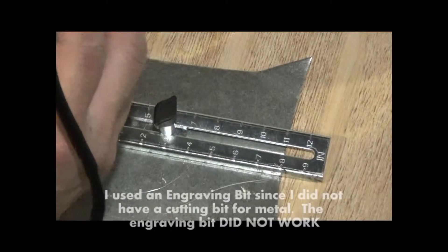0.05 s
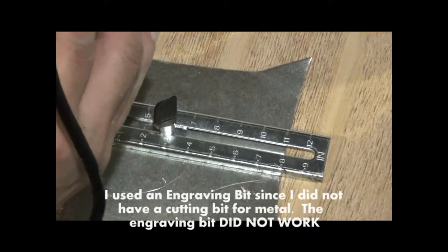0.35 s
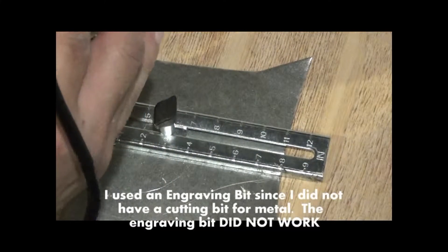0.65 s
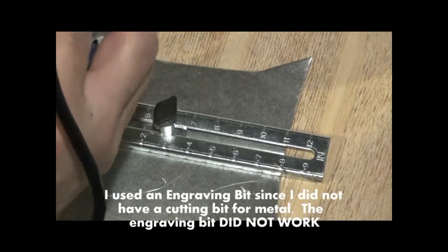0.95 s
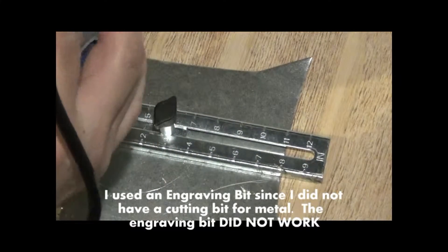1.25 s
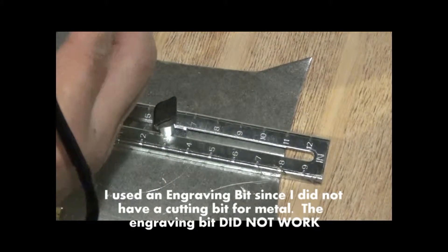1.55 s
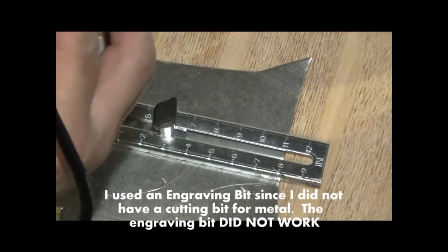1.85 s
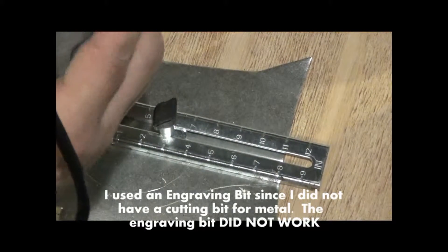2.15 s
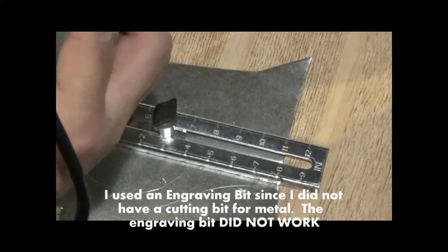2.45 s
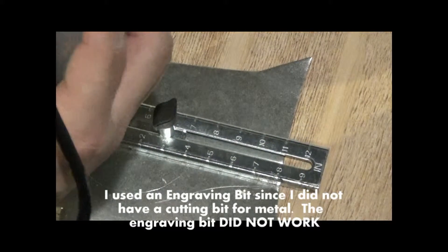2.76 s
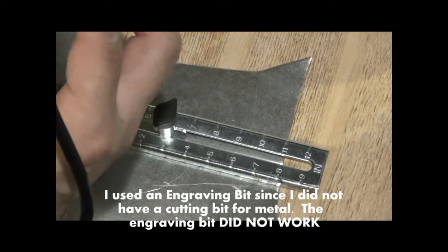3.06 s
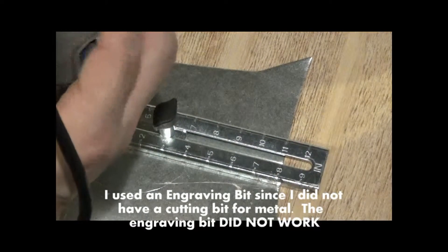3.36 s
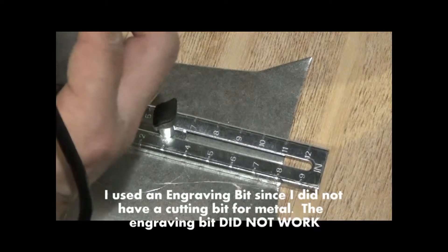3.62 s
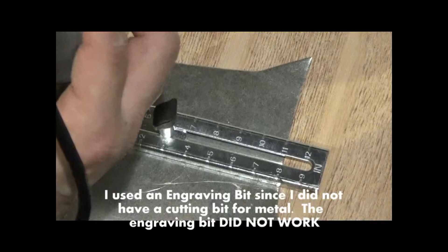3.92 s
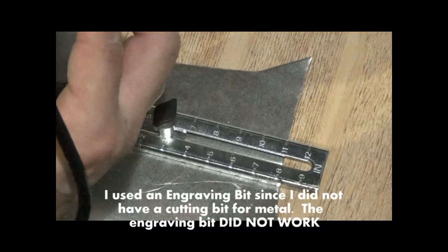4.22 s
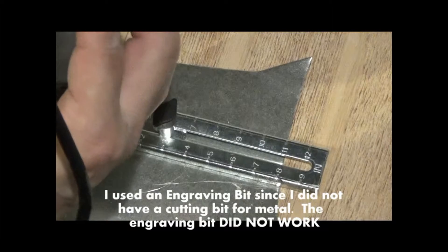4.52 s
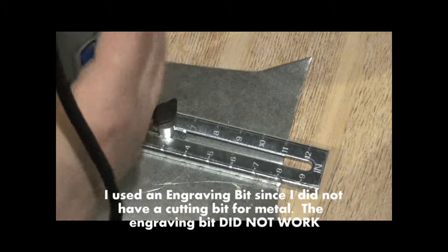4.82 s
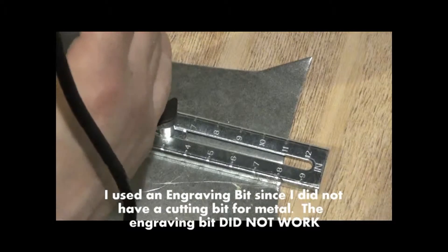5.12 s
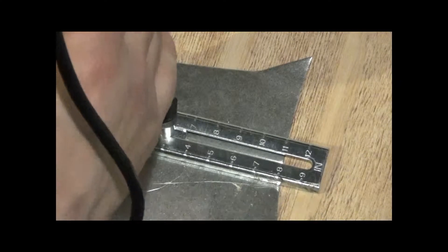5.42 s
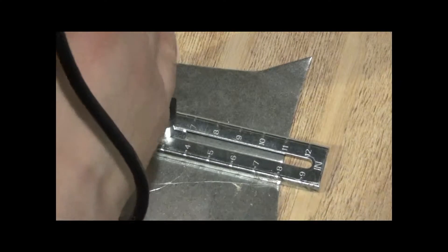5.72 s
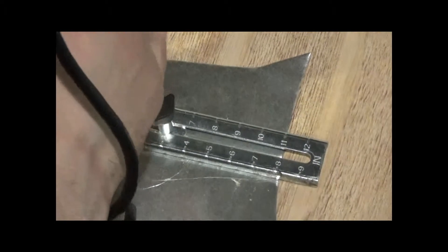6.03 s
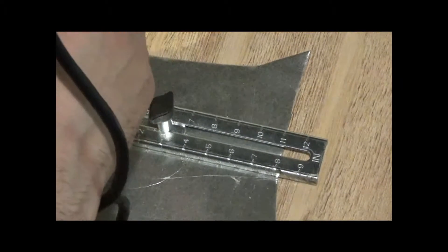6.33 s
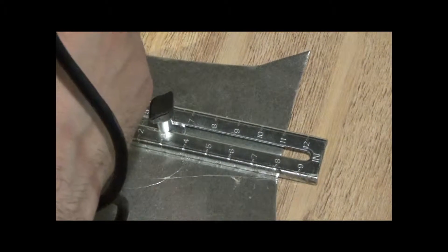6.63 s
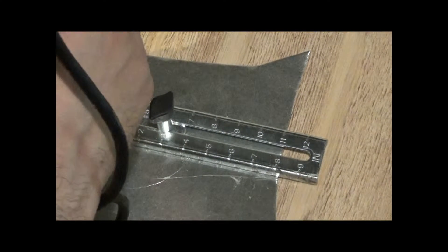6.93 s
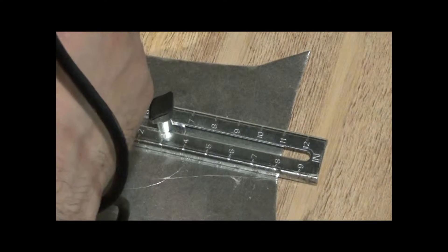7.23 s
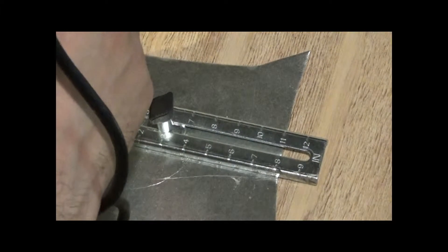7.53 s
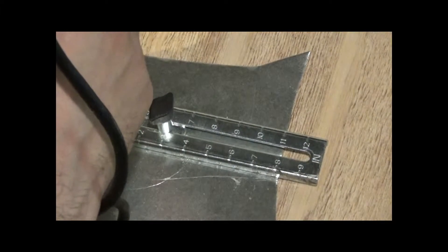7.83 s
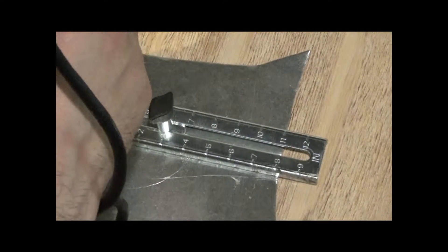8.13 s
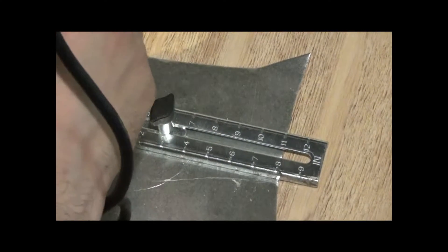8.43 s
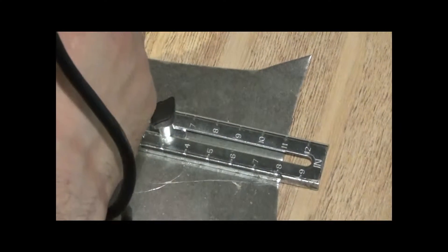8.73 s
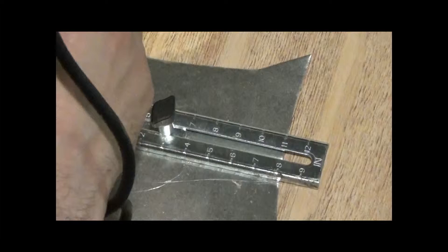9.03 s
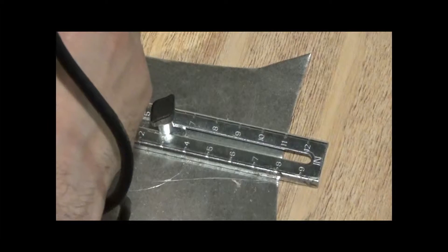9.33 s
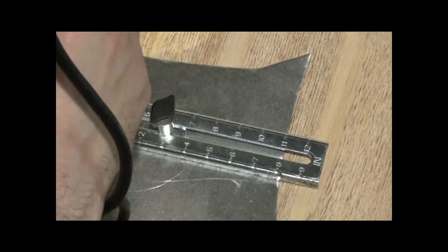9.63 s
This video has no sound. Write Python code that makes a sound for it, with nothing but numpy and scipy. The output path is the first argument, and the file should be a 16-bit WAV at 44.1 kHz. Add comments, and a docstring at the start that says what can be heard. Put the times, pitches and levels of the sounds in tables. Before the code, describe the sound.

A handheld rotary tool runs slowly with a quiet, low buzz, its bit drawing thin, wavering squeaks from sheet metal for the first two seconds. From about 1.2 seconds the motor climbs in steps, growing louder and growling with each rise, most clearly around 2 and 2.6 seconds. Between roughly 2.7 and 4.3 seconds it is rough and rattling, with a brief scraping skid near 2.9 seconds and short ringing chatters from the sheet as the pitch keeps rising. By 5 seconds it reaches full speed and smooths into a high whine over airy hiss and light scraping. A piercing whistle on top swells and fades irregularly, dipping most around 8.5 seconds and returning strongly by 9.5. The tool is still running at the end, near 10 seconds. It sounds close and slightly to the right, in a quiet workshop with little echo.

```python
"""A low buzzing crawl with thin squeaks climbs step by step to a high whine: a handheld rotary tool is
turned up while its bit scores sheet steel on a bench. Its pitches are orders, whole multiples of the
shaft rate. Chopped mains current makes the motor growl whenever it speeds up; at middle speeds the
shaft rattles in its bearings. At full speed fan air, brush hiss and the scraping bit lie under a
piercing 24th-order whistle that swells and fades as the hand moves."""
import sys
import numpy as np
from scipy import signal
from scipy.fft import rfft, irfft, next_fast_len
from scipy.io import wavfile
from scipy.ndimage import uniform_filter1d, map_coordinates

SR = 44100
rng = np.random.default_rng(int(sys.argv[2]) if len(sys.argv) > 2 else 0)


def put_to_file(sound):
    """Save the sound as 16-bit audio at rate SR, in the file named by the first command-line argument."""
    columns = np.atleast_2d(sound).T  # one column per channel
    safe = np.clip(columns, -1, 1)
    whole_steps = np.round(safe * 32767)
    wavfile.write(sys.argv[1], SR, whole_steps.astype(np.int16))


N = 435266
TIME = np.arange(N) / SR
PULSE_HZ, TOP_HZ = 120, 15850  # current pulse rate, band limit

# Spectra of the room, bit, fan, brushes and bearing knocks: (frequency [Hz], relative density [dB])
ROOM_SPECTRUM = [(20, -3), (60, 6), (130, -4.5), (400, 18.5), (2000, -10), (15000, -35)]
SCRAPE_SPECTRUM = [(100, -71), (250, -30.5), (420, -20), (700, -5), (1400, 3.5), (1900, 4), (2300, 10.5),
                   (2900, -2.5), (4000, 9.5), (5600, -2.5), (6500, -4.5), (12000, -17)]
FAN_SPECTRUM = [(200, -66), (1500, -24), (3000, -2.5), (4200, 0.5), (5900, 4.5), (6300, -3.5), (6800, -2),
                (7500, 3.5), (8500, 1), (9800, 1.5), (11500, 6), (14000, -31.5)]
BRUSH_SPECTRUM = [(280, -29), (450, -16.5), (780, -5.5), (1600, -11.5), (2450, -3.5), (3000, -3),
                  (3700, -17.5), (5200, -2.5), (6500, -15), (9000, -4), (11200, 1.5), (12500, 3),
                  (14000, -3), (15700, -7.5)]
KNOCK_SPECTRUM = [(100, -27), (400, -8), (1000, -4), (1600, -4), (2400, -4), (3300, 3.5), (4300, 3.5),
                  (5600, 0), (6600, -20), (8000, -1), (15000, -13)]
# Likeness of noise at the two ears: (frequency [Hz], correlation [0-1])
EAR_COHERENCE = [(60, 0.36), (180, 1), (550, 1), (1650, 1), (4970, 0.99), (15000, 0.98)]
# The tool sits a little to the right: (frequency [Hz], left minus right [dB])
EAR_BALANCE = [(100, -1), (220, -2), (380, -4), (800, -2), (1300, -.4), (4000, 0), (15000, 0)]
# Phase difference between the ears: (frequency [Hz], left lead [rad])
EAR_PHASE = [(0, 0), (260, -0.8), (600, -0.12), (9300, -0.31), (9730, -0.13), (10400, -0.11),
             (15900, -0.21)]
# Squeaks of the slow bit: (centre [s], duration [s], frequency [Hz], level [dB])
BIT_SQUEAKS = [(.03, .15, 5450, -53), (.24, .3, 4880, -49), (.45, .34, 5520, -51), (.7, .26, 5380, -52),
               (.9, .25, 5540, -50), (1.16, .36, 4930, -49), (1.8, .32, 4900, -49)]
# Flares of the sheet: (centre [s], duration [s], order [x shaft rate], level [dB])
SHEET_FLARES = [(1.58, 0.13, 7, -45.5), (1.815, 0.35, 6, -48), (2.866, 0.037, 4, -23),
                (2.934, 0.089, 3, -21.5), (3.288, 0.11, 2, -24.5), (3.428, 0.06, 6, -24.5),
                (3.934, 0.16, 2, -21)]
# Rubbing and fan noise as the hand bears down: (time [s], relative level [dB])
HAND_PRESSURE = [(3.9, -21.5), (4.18, -22), (4.4, -19.5), (4.5, -23), (4.8, -22.5), (4.83, -24),
                 (5.21, -25), (6.09, -25), (6.98, -21.5), (7.16, -24.5), (7.39, -23.5), (9.3, -21.5),
                 (9.45, -24), (9.87, -23.5)]
# Partials of the field coils: (harmonic [x pulse rate], level [dB])
COIL_PARTIALS = [(3, -50), (4, -58), (6, -60), (7, -58)]
# Looseness, greatest near the critical speed: (speed [turns/s], play [dB])
BEARING_PLAY = [(100, -29.5), (210, -26), (265, -21), (310, -1.5), (338, 2), (404, -1), (423, -7),
                (454, -13), (460, -54)]
# Tones of the rattling shaft: (order [x shaft rate], level [dB])
RATTLE_ORDERS = [(4, -33.5), (5, -37), (6, -36), (7, -30), (9, -36), (10, -38), (11, -36), (15, -48),
                 (23, -51), (25, -47), (31, -59), (32, -40)]
# Housing resonances: (frequency [Hz], bandwidth [Hz], relative gain [dB])
HOUSING_MODES = [(732, 160, -5), (2264, 127, -2), (2480, 167, -2), (3000, 133, -0.5), (4240, 530, -12),
                 (5360, 73, -9)]
# Nudges of the dial: (start [s], settling time [s], speed reached [turns/s])
DIAL_STEPS = [(1.2, .55, 123.5), (1.902, .233, 179.8), (1.929, .484, 208.4), (2.585, .384, 337.7),
              (3.17, .382, 404.5), (3.79, .4, 425), (4.3, .57, 458.1), (5.45, .45, 460.6)]
# Current drawn at a steady speed: (speed [turns/s], relative current [dB])
STEADY_CURRENT = [(100, -6), (123, -6.5), (205, -1), (338, 4), (403, -5), (425, 4), (458, -17)]
# Once-a-turn tone of the unbalanced shaft: (time [s], level [dB])
UNBALANCE_LEVEL = [(1.15, -75), (1.8, -61), (2.23, -40), (2.58, -37), (2.73, -49), (2.89, -27),
                   (3.1, -34.5), (3.4, -29), (3.88, -28), (4.1, -33.5), (4.9, -48), (5.2, -45.5),
                   (6.07, -49.5), (7.5, -66), (8.4, -54), (9.87, -64)]
# Strong tones: (order [x shaft rate], full-speed level [dB], speed exponent [-], loose-shaft part [dB])
MAIN_ORDERS = [(2, -41.5, 7.3, -31.5), (3, -39, 10, -30.5), (8, -32.5, 12, -31), (12, -31.5, 2.12, -50)]
# Weak tones: (order [x shaft rate], full-speed level [dB])
WEAK_ORDERS = [(4, -46.5), (5, -43), (9, -42), (14, -66), (16, -43), (18, -47), (20, -44), (22, -65),
               (23, -67), (25, -56), (26, -43)]
# How well tool and sheet radiate: (frequency [Hz], gain [dB])
RADIATION = [(200, -19), (420, 1), (610, -3.5), (680, -2), (810, 2.5), (890, 1.5), (925, -1), (1010, -5.5),
             (1215, 2.5), (1300, -4), (1372, -6), (1398, 3), (1650, 5), (2700, 2.5), (3250, 2), (3450, -7),
             (3700, -2), (5000, 0)]
# Slot tones as the hand moves: (time [s], relative 8th order [dB], relative 12th order [dB])
SLOT_LEVELS = [(4.6, -35, -33), (4.72, -41, -30), (4.82, -33, -42), (5.22, -36.5, -34),
               (6.13, -45.5, -39.5), (6.33, -37, -40.5), (6.87, -33.5, -37), (7.03, -38.5, -29.5),
               (8.02, -35.5, -30), (9.16, -38, -32), (9.87, -39.5, -36.5)]
# The whistle climbs into a resonance: (speed [turns/s], level [dB])
WHISTLE_RESONANCE = [(110, -70), (210, -42), (300, -41), (338, -32.5), (403, -29.5), (424, -22.5),
                     (452, -15.5), (458, -15.5)]
# The whistle as the hand moves: (time [s], gain [dB], left minus right [dB])
WHISTLE_SWELLS = [(4.9, -3, -2.5), (5.05, 1, 0), (5.5, 0, -2), (5.98, -8, 8.5), (6.34, -4, -0.5),
                  (6.91, -10, -5), (7.02, -1, -1), (7.8, 0, 1), (8.15, -5, -4), (8.38, -5.5, -3),
                  (8.54, -17, 16), (8.75, -9, 4), (9.45, 0, 1.5), (9.87, 1, -1)]
# Dips where the whistle cancels against its reflection: (time [s], left gain [dB], right gain [dB])
WHISTLE_NULLS = [(4.538, -1, -1), (4.66, -4, -4), (5.59, -7, -11), (5.79, -6, -14), (6.27, -10, -2.5),
                 (6.53, -9, -5), (6.66, -2, -11), (7.42, -12, -5.5), (7.52, -17, -7.5), (7.85, -9, -15),
                 (7.93, -13, -8), (8.44, -11, -9), (8.92, -9, -20)]


def amp(db):
    """Amplitude ratio from decibels."""
    return 10 ** (np.asarray(db) / 20)


def unit(x):
    """Normalisation to rms 1."""
    return x / np.sqrt(np.mean(x ** 2) + 1e-20)


def along(points, hz):
    """Interpolation on a logarithmic frequency axis."""
    knots_hz, values = np.transpose(points)
    return np.interp(np.log(hz + 1), np.log(knots_hz + 1), values)


def by_speed(points, speed):
    """Linear interpolation over shaft speed."""
    return np.interp(speed, *np.transpose(points))


def curves(rows):
    """Linear envelopes, one for each column after the time."""
    times, *columns = np.transpose(rows)
    return [np.interp(TIME, times, column) for column in columns]


def swing(rows):
    """Level envelopes in dB about each column's mean."""
    return [level - np.mean(points) for level, points in zip(curves(rows), np.transpose(rows)[1:])]


def swell(centre_s, length_s):
    """A half-sine envelope."""
    return np.sin(np.pi * np.clip((TIME - centre_s) / length_s + .5, 0, 1))


def wobble(rate):
    """Smooth random modulation, rate knots a second."""
    knots = rng.standard_normal(int(N * rate / SR) + 4)
    return map_coordinates(knots, [TIME * rate], order=2)


def tone(phase):
    """A sinusoid of rms 1 and random initial phase."""
    return np.sqrt(2) * np.sin(phase + rng.uniform(0, 2 * np.pi))


def bursts(phase, sharpness):
    """A periodic envelope of rms 1, one smooth burst a cycle."""
    return unit(np.exp(sharpness * np.cos(phase)))


def partials(table, phase, waver_db):
    """A harmonic series whose members waver independently."""
    return sum(amp(db + waver_db * wobble(11)) * tone(round(k) * phase) for k, db in table)


def filtered(x, response):
    """Linear filtering by a complex frequency response."""
    size = next_fast_len(N + SR // 4)
    return irfft(rfft(x, size) * response(np.fft.rfftfreq(size, 1 / SR)), size)[..., :N]


def panned(x, left_db):
    """Stereo from an interaural level difference."""
    return np.array([x * amp(left_db / 2), x * amp(-left_db / 2)])


def rush(spectrum, gate):
    """Gated, coloured noise of rms 1, partly coherent between the ears."""
    def response(hz):
        spread = np.arccos(np.clip(along(EAR_COHERENCE, hz), -1, 1)) / 2
        return amp(along(spectrum, hz)) * [np.cos(spread), np.sin(spread)]
    mid, side = filtered(gate * rng.standard_normal((2, N)), response)
    return unit(np.array([mid + side, mid - side]))


def worn_turn(angle, size, slot_db=0):
    """Roughness that repeats each turn has a line spectrum; slot_db lifts every eighth order."""
    orders = np.arange(size // 2 + 1)
    strength = amp(slot_db * (orders % 8 == 0) + 2 * rng.standard_normal(len(orders))) * (orders > 0)
    profile = irfft(strength * np.exp(2j * np.pi * rng.random(len(orders))), 16 * size)
    positions = np.linspace(0, 2 * np.pi, len(profile), endpoint=False)
    return unit(np.interp(angle, positions, profile, period=2 * np.pi))


def shaft_speed(crawl_hz=101.3, warm_s=5.5, creep_hz_per_s=1.47):
    """Rotation rate in turns/s: it eases up to each dial setting, and creeps once the motor is warm."""
    speed = crawl_hz + creep_hz_per_s * np.maximum(TIME - warm_s, 0)
    before = crawl_hz
    for start, settle, reached in DIAL_STEPS:
        progress = np.clip((TIME - start) / settle, 0, 1)
        speed = speed + (reached - before) * (1 - np.cos(np.pi * progress)) / 2
        before = reached
    return speed


def shaft_angle(speed, mains, jitter=0.00019, crawl_jitter=0.00154, torque_ripple_rad=0.00051):
    """Phase is the integral of speed, which is less even when the motor runs slowly."""
    slowness = speed.min() / speed
    hunting = .004 * slowness ** 4 * wobble(10)
    unsteady = (jitter + crawl_jitter * slowness ** 2) * wobble(40)
    turns = np.cumsum(speed * (1 + unsteady + hunting)) / SR
    return 2 * np.pi * turns + torque_ripple_rad * np.sin(mains)


def current_db(speed, surge_db_per_accel=0.0365, lag_s=.02):
    """Torque takes current: a steady draw plus a surge that trails the acceleration."""
    acceleration = np.interp(TIME - lag_s, TIME, np.gradient(speed) * SR)
    return by_speed(STEADY_CURRENT, speed) + surge_db_per_accel * acceleration


def play(speed):
    """Bearing play as a gain, peaking around the shaft's critical speed."""
    return amp(by_speed(BEARING_PLAY, speed))


def room_tone():
    """The ambient noise floor: a faint, low, steady rush."""
    return amp(-59) * rush(ROOM_SPECTRUM, 1)


def workshop(x, wall_t60=0.44, wall_db=-21, bench_t60=0.012, bench_db=-18):
    """Reflection: sheet and bench answer at once, opposite in each ear; the walls reverberate weakly."""
    t = TIME[:SR // 4]
    tail = rng.standard_normal((2, len(t))) * amp(-60 * t / wall_t60)
    early = rng.standard_normal(len(t)) * amp(-60 * t / bench_t60)
    walls = amp(wall_db) * tail / np.linalg.norm(tail[0])
    bench = amp(bench_db) * early / np.linalg.norm(early) * [[1], [-1]]
    return x + signal.fftconvolve(x, walls + bench, axes=1)[:, :N]


def ears(hz):
    """Interaural level and phase differences place the tool slightly to the right."""
    return panned(0.94, along(EAR_BALANCE, hz)) * np.exp(.5j * along(EAR_PHASE, hz) * [[1], [-1]])


def squeaks(drift=0.0045, flutter_db=3):
    """Friction-excited vibration: the slow bit draws thin, wavering squeals from the steel."""
    clock = np.cumsum(1 + drift * wobble(30)) / SR
    return sum(amp(db) * swell(centre, length) * amp(flutter_db * wobble(35.8))
               * tone(2 * np.pi * hz * clock) for centre, length, hz, db in BIT_SQUEAKS)


def chatter(angle):
    """Resonance: under the bouncing bit the sheet flares briefly at single shaft orders."""
    return sum(amp(db) * swell(centre, length) * tone(round(order) * angle)
               for centre, length, order, db in SHEET_FLARES)


def scrape(speed, skid_db=14):
    """Sliding friction: grainy noise grows with speed; the bit skids once as the motor races up."""
    contact = (speed / speed.max()) ** 1.36 * amp(skid_db * swell(centre_s=2.88, length_s=0.35))
    grains = amp(2.04 * wobble(900) + 1.43 * wobble(25))
    return contact * amp(-31.5) * rush(SCRAPE_SPECTRUM, grains)


def fan(angle, speed):
    """Aerodynamic noise, pulsing once a turn and growing as a power of speed."""
    return (speed / speed.max()) ** 1.8 * amp(-26) * rush(FAN_SPECTRUM, bursts(angle, sharpness=0.49))


def commutator(angle, flicker_db=6):
    """Periodic contact: two brushes bounce independently over eight worn bars, giving a bright comb."""
    bars = sum(worn_turn(angle, size=256, slot_db=9) * amp(flicker_db * wobble(14)) for _ in range(2))
    running_rms = np.sqrt(np.abs(uniform_filter1d(bars ** 2, SR // 50)) + 1e-9)
    comb = filtered(bars / running_rms, lambda hz: amp(along(BRUSH_SPECTRUM, hz)))
    return unit(comb) * amp(wobble(25.55))


def brushes(angle, speed, mains, knee_speed=190):
    """Sparking gives broadband noise; at speed the commutator's comb smears into this hiss."""
    sparks = rush(BRUSH_SPECTRUM, bursts(mains, sharpness=0.032) * amp(wobble(1500)))
    pitched_share = np.interp(speed, [100, 125, 205, 340], [.25, .55, .55, 0])
    blend = np.sqrt(1 - pitched_share) * sparks + np.sqrt(pitched_share) * commutator(angle)
    return amp(-28) / np.sqrt(1 + (knee_speed / speed) ** 3.7) * blend


def hum(speed, mains, fast_db=-16, fade_speed=320):
    """Magnetic hum of the field coils: overtones fade at speed; the fundamental follows the current."""
    throb = amp(-71 + current_db(speed) / 2) * tone(mains)
    fade_db = fast_db / (1 + (fade_speed / speed) ** 8)
    return throb + amp(fade_db - 2) * partials(COIL_PARTIALS, mains + 0.13 * wobble(16), waver_db=2)


def rattle(angle, speed, mains):
    """Impact and modulation: the loose shaft knocks once a turn; current pulses add buzzing sidebands."""
    knocks = rush(KNOCK_SPECTRUM, bursts(angle, sharpness=0.5) * amp(wobble(200)))
    tones = partials(RATTLE_ORDERS, angle + 0.075 * wobble(120), waver_db=2)
    tones *= bursts(mains, sharpness=0.53)
    chopped = worn_turn(angle, size=64) * bursts(mains, sharpness=1.5)
    buzz = unit(filtered(chopped, lambda hz: amp(along(KNOCK_SPECTRUM, hz))))
    strain = amp(current_db(speed))
    return play(speed) * (amp(-28) * knocks + amp(-2) * tones + amp(-24) * strain / strain.max() * buzz)


def housing(hz):
    """Modal superposition: the housing responds as damped resonators of alternating sign."""
    return sum((-1) ** k * amp(db) * 1j * hz * width / (centre ** 2 - hz ** 2 + 1j * hz * width)
               for k, (centre, width, db) in enumerate(HOUSING_MODES))


def growl(angle, speed, mains, wear=0.66):
    """Forced vibration: current pulses tug at eight slots, whose orders sweep the housing's modes."""
    drive_db = current_db(speed)
    slip = np.interp(drive_db, [0, 12], [.6, 1]) * wobble(260)
    slots = unit(sum(tone(order * angle + slip) for order in (8, 9, 16, 17, 24, 25)))
    pull = slots + wear * worn_turn(angle, size=128) + .1 * rng.standard_normal(N)
    force = pull * bursts(mains, sharpness=1) * amp(1.7 * wobble(80))  # the pulses fire unevenly
    return amp(-41 + drive_db) * unit(filtered(force, housing))


def shaft(angle, speed, mains):
    """Rotational harmonics: unbalance and armature slots sing; the orders grow with speed and play."""
    pace = speed / speed.max()
    loose = np.clip(play(speed), 0, 1)
    rocked = angle + loose * (.1 * np.sin(mains) + .03 * wobble(150))  # it rocks with the current
    sound = amp(curves(UNBALANCE_LEVEL)[0] + wobble(18)) * tone(angle)
    spun_up = np.clip(speed / 200, 0, 1) ** 2
    hand_db = dict(zip((8, 12), swing(SLOT_LEVELS)))
    for order, db, exponent, loose_db in MAIN_ORDERS:
        order = round(order)
        drive = amp(db + hand_db.get(order, 0)) * pace ** exponent + amp(loose_db) * loose
        radiated = drive * amp(along(RADIATION, order * speed))
        waver = amp((1.2 + 1.8 * loose) * wobble(14))
        sound += spun_up * radiated * waver * tone(order * rocked)
    return sound + pace ** 4 * partials(WEAK_ORDERS, angle, waver_db=3)


def whistle(angle, speed, mains, ripple=0.085, null_half_width_s=0.032, sway_rad=0.16):
    """Resonance lifts the 24th order; it swells as the hand moves and dips by destructive interference."""
    hand_db, left_db = curves(WHISTLE_SWELLS)
    null_db = sum(np.array([[left], [right]]) * np.exp(-((TIME - centre) / null_half_width_s) ** 2)
                  for centre, left, right in WHISTLE_NULLS)
    loose = np.clip(play(speed), 0, 1)
    flutter_db = wobble(90) + (1.1 + 3 * loose) * wobble(20)
    level_db = by_speed(WHISTLE_RESONANCE, speed) + hand_db + flutter_db
    envelope = amp(level_db) * (1 + ripple * np.cos(mains))
    phase = 24 * angle + sway_rad * wobble(4) * [[1], [-1]]
    return panned(envelope, left_db) * amp(null_db) * tone(phase)


def scene():
    """Superposition: one shaft angle and one current-pulse phase tie the tool's sounds together."""
    speed = shaft_speed()
    mains = 2 * np.pi * PULSE_HZ * TIME
    angle = shaft_angle(speed, mains)
    motor = shaft(angle, speed, mains) + growl(angle, speed, mains)
    motor += hum(speed, mains)
    bearings = rattle(angle, speed, mains)
    noise = scrape(speed) + fan(angle, speed) + brushes(angle, speed, mains)
    noise *= amp(swing(HAND_PRESSURE)[0])
    tool = motor + bearings + noise + chatter(angle) + squeaks()
    return workshop(filtered(tool, ears)) + whistle(angle, speed, mains) + room_tone()


def record(dry):
    """Band limiting: an ideal low-pass filter removes everything above TOP_HZ."""
    return filtered(dry, lambda hz: hz < TOP_HZ)


dry = scene()
out = record(dry)
put_to_file(out)
```